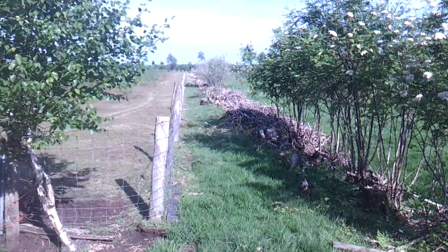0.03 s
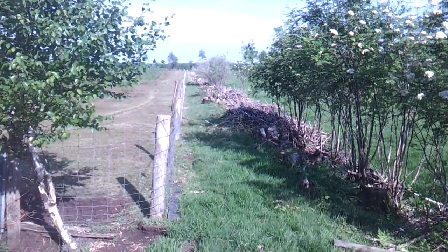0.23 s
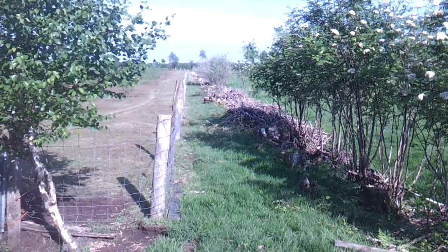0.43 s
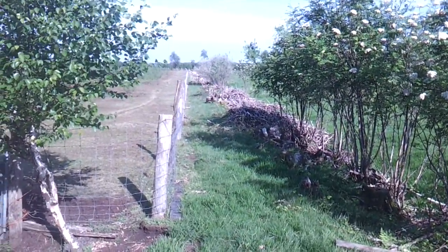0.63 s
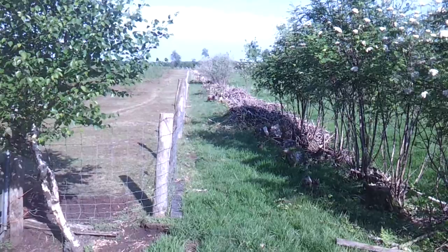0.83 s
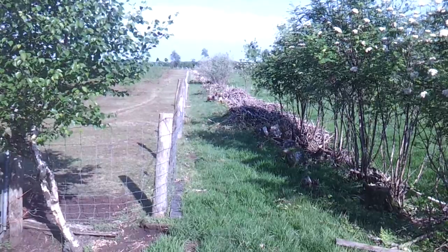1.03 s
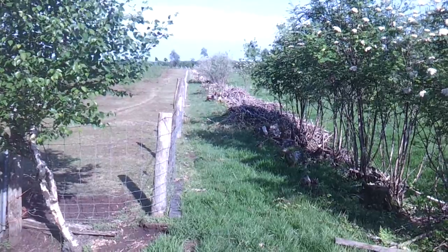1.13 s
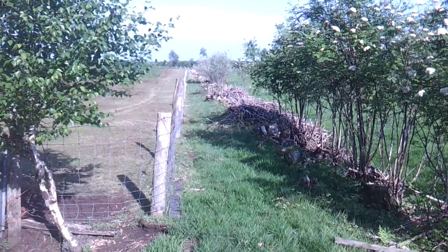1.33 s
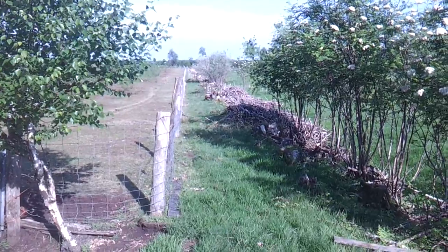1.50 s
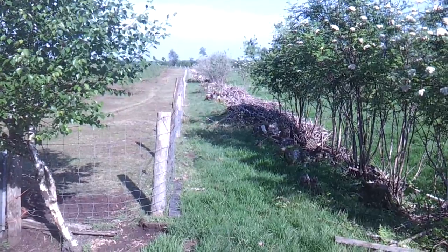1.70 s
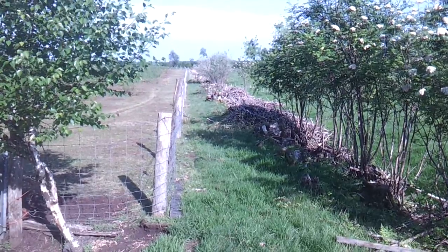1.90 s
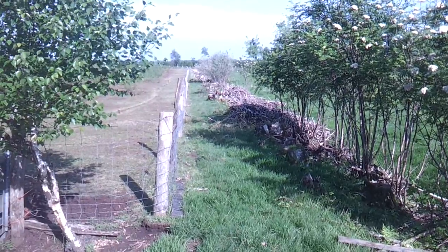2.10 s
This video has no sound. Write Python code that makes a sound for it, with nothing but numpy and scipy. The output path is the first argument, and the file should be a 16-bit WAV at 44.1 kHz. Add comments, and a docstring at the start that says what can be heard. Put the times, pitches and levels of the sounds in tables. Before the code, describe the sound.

A lamb gives one thin bleat, with faint birds and wind buffeting the microphone.

```python
"""A soft hiss hangs over an open paddock; songbirds whistle and twitter in the hedge, which echoes faintly.
Almost at once a gust pops and rumbles on the microphone. With the next gust a lamb close by gives
one thin, bright bleat: its vocal folds ring a small throat, crack once and slacken to a creak.
The birds carry on, and weaker gusts buffet the microphone to the end."""
import sys
import numpy as np
from scipy import signal
from scipy.fft import rfft, irfft
from scipy.io import wavfile

SR = 44100
rng = np.random.default_rng(int(sys.argv[2]) if len(sys.argv) > 2 else 0)


def generate_wav(signal):
    """Clip the signal to [-1, 1] and save it as 16-bit WAV at the path in sys.argv[1]."""
    frames = np.transpose(np.atleast_2d(signal))
    scaled = np.clip(frames, -1, 1) * 32767
    pcm = np.round(scaled).astype(np.int16)
    wavfile.write(sys.argv[1], SR, pcm)


N = 94815
T = np.arange(N) / SR
TOP_HZ = 15500


def amp(db):
    """Decibels to gain."""
    return 10 ** (np.asarray(db) / 20)


def unit(x):
    """Scales to rms 1."""
    return x / np.sqrt(np.mean(x ** 2) + 1e-20)


def add(mix, start_s, sound):
    """Drops a sound into the mix at a given time."""
    part = mix[max(round(start_s * SR), 0):][:len(sound)]
    part += sound[:len(part)]


def drift(size, hz):
    """Random modulation below hz, with an rms of about 1."""
    passband = np.fft.rfftfreq(N, 1 / SR) < hz
    return unit(irfft(rfft(rng.standard_normal(N)) * passband, N))[:size]


def colour(x, points):
    """Minimum-phase EQ through points of (frequency [Hz], gain [dB])."""
    size = 8192
    hz, db = np.transpose(points)
    log_hz = np.log(abs(np.fft.fftfreq(size, 1 / SR)) + 1)
    log_gain = np.log(amp(np.interp(log_hz, np.log(hz), db)))
    taps = np.fft.ifft(np.exp(np.conj(signal.hilbert(log_gain)))).real[:size // 2]
    return signal.fftconvolve(x, taps)[:len(x)]


def air():
    """The bed: an even, slightly wavering hiss of open field."""
    # tone of the outdoor hiss (frequency [Hz], gain [dB])
    hiss = [(30, -3), (200, -13), (420, -26), (620, -12.5), (850, -27.5), (1300, -24.5), (2900, -26.5),
            (4500, -26), (6400, -22.5), (8300, -34), (11000, -37), (15000, -37)]
    level_db, waver_db = -56.5, -0.66
    return unit(colour(rng.standard_normal(N), hiss)) * amp(level_db + waver_db * drift(N, hz=3.4))


def wind():
    """Lumpy turbulence rumbles; each eddy pops as a lopsided dip of pressure and sheds a short wake."""
    # swell of the turbulence (time [s], level [dB])
    gusts = [(0, -48.5), (.19, -47), (.24, -28), (.29, -41.5), (.45, -50), (.53, -51.5), (.62, -46),
             (.69, -29), (.8, -42.5), (1.0, -40.5), (1.13, -41.5), (1.18, -51.5), (1.4, -54.5), (1.55, -53),
             (1.7, -45.5), (1.9, -47), (2.06, -56), (2.15, -50.5)]
    # tone of the turbulence (frequency [Hz], gain [dB])
    rumble = [(15, -24.5), (30, -3), (70, 4), (160, -1), (260, -13.5), (420, -24.5), (800, -16.5),
              (2000, -58.5)]
    # eddies striking the microphone (time [s], level [dB], main frequency [Hz])
    eddies = [(.152, -39.5, 135), (0.2121, -11.5, 413.4), (0.2167, -21, 218), (0.223, -13, 393),
              (.233, -11.5, 270), (.2510, -11.5, 467.6), (0.2546, -11, 280), (.263, -18.5, 302.2),
              (0.336, -38.5, 110), (0.412, -41, 60), (0.45, -33, 60), (0.6414, -19, 260), (.6435, -25, 300),
              (.679, -22, 121), (.6843, -20.5, 316), (0.692, -12, 235.9), (0.705, -17, 161.4),
              (.731, -22.5, 154), (.742, -13.5, 156.2), (.777, -22, 99), (0.792, -28, 148.1),
              (.859, -16.5, 186.2), (0.8621, -11.5, 330.8), (0.8924, -24.5, 217), (0.915, -28, 109),
              (.929, -28.5, 109.5), (0.9559, -16.5, 218), (.981, -21.5, 168), (.998, -23, 125),
              (1.039, -25, 103), (1.1205, -19.5, 121.4), (1.253, -43.5, 130), (1.288, -47, 110),
              (1.447, -28.5, 92.6), (1.535, -40.5, 180), (1.585, -27, 132), (1.608, -32.5, 141.5),
              (1.686, -33.5, 210), (1.696, -26.5, 140), (1.728, -24.5, 270.5), (1.757, -35, 170),
              (1.771, -31.5, 129.4), (1.849, -27, 198.3), (1.878, -22, 122.7), (1.913, -35, 111),
              (1.976, -28, 201.5), (2.017, -36.5, 129), (2.114, -29, 203)]
    lumps_db, neutral_gust_db = 3, -29
    eddy_order, wake_s, wake_db = 1.92, 0.0033, -12.5
    gust = amp(np.interp(T, *np.transpose(gusts)))
    out = unit(colour(rng.standard_normal(N), rumble) * amp(lumps_db * drift(N, hz=36.6))) * gust
    top = signal.filtfilt(*signal.butter(2, 222, "high", fs=SR), out)
    out += top * ((gust / amp(neutral_gust_db)) ** 0.25 - 1)  # stronger gusts are brighter
    for (at, db, hz), skew in zip(eddies, 0.67 * rng.uniform(0, 1.9, len(eddies))):
        passage = 2 * np.pi * hz * (T - at) / eddy_order
        dip = (np.exp(-1j * skew) / (1 - 1j * passage) ** (eddy_order + 1)).real
        age = np.maximum(T - at, 0) / wake_s
        wake = age * np.exp(1 - age) * drift(N, hz=.6 * hz) * np.sin(2 * np.pi * hz * T)
        out += amp(db) * (amp(wake_db) * wake - dip)
    return out


def birds():
    """Warbling whistles, each arching through three pitches. Two stems: song and far, rough twitter."""
    # bird notes and one faint low call from afar (start [s], length [s], first pitch [Hz],
    # middle pitch [Hz], last pitch [Hz], level [dB], warble depth [Hz])
    notes = [(0, 0.094, 586, 588, 580, -61, 38), (0.024, 0.052, 2810, 2940, 2930, -64.5, -2),
             (0.061, 0.05, 3000, 3154, 2940, -55, 0), (0.051, .035, 1900, 2200, 2800, -67, 0),
             (0.086, 0.031, 2650, 1980, 1770, -63.5, -4), (0.292, 0.04, 3070, 3010, 2800, -63.5, 30),
             (0.321, 0.055, 2700, 2730, 2900, -65.5, 45), (.3, .216, 1830, 1865, 1868, -54.5, 72),
             (0.322, 0.027, 4600, 4600, 4660, -68.5, -5), (0.416, 0.063, 3560, 3140, 2690, -62.5, 56),
             (0.533, 0.055, 2200, 2260, 2240, -64, 0), (.568, 0.09, 2440, 2210, 1900, -58, 26),
             (.57, 0.089, 6470, 6080, 5680, -60.5, 56), (0.592, 0.038, 4230, 4210, 3860, -66, 0),
             (.865, 0.12, 1810, 1813, 1923, -63, 33), (0.957, .152, 1894, 2042, 2024, -50.5, 0),
             (1.13, 0.072, 2306, 2533, 2600, -58, 24), (1.143, 0.11, 2290, 2253, 1970, -66.5, 23),
             (1.166, 0.092, 2705, 2823, 2626, -61, 220), (1.241, 0.083, 2605, 2380, 2170, -65.5, 54),
             (1.201, .347, 1628, 1894, 1606, -59.5, 22), (1.797, 0.02, 4300, 3530, 3020, -60.5, 4),
             (1.809, 0.031, 4210, 4700, 4360, -63, 88), (1.833, .013, 3640, 3530, 3400, -71, 3),
             (1.844, 0.018, 4110, 4550, 4650, -69, 0), (1.866, 0.021, 3130, 3580, 4060, -65, 2),
             (1.892, 0.015, 3900, 3280, 3100, -70, 0), (1.958, 0.028, 4720, 4200, 3900, -69, 0)]
    warble_hz, warble_fade_s, tremolo_db_per_hz, buzz_depth_hz = 43.6, .13, .06, 100
    waver_hz, rough_hz, twitter_above_hz = 15.2, 240, 3350
    edge_s, flutter_db = 0.0019, 2
    song, twitter = np.zeros((2, N))
    for start, length, first, middle, last, db, depth in notes:
        far = middle > twitter_above_hz
        t = np.arange(0, length, 1 / SR)
        progress = t / length
        rate = warble_hz * (3.9 if depth > buzz_depth_hz else 1)  # a deep warble is a fast buzz
        rate = rate * (1 + 0.27 * drift(len(t), hz=42))
        warble_fade = np.exp(-t / warble_fade_s)
        warble = np.sin(2 * np.pi * np.cumsum(rate) / SR) * warble_fade
        arch = np.polyval(np.polyfit([0, .5, 1], [first, middle, last], 2), progress)
        hz = arch + depth * warble + waver_hz * drift(len(t), hz=44.8)
        hz += far * rough_hz * drift(len(t), hz=420)
        envelope = np.clip(np.minimum(t, length - t) / edge_s, 0, 1) * np.sin(np.pi * progress) ** 0.22
        tremolo = amp(tremolo_db_per_hz * min(depth, buzz_depth_hz) * (warble - warble_fade))
        whistle = unit(envelope * tremolo * np.sin(2 * np.pi * np.cumsum(hz) / SR))
        add(twitter if far else song, start, whistle * amp(db + flutter_db * drift(len(t), hz=55.6)))
    return song, twitter


def hedge(send):
    """Trees and hedge scatter the sound into a short tail of echoes."""
    predelay_s, t60_s, echoes_per_s = .008, .33, 2000
    t = T[:SR]
    taps = rng.standard_normal(SR) * (rng.random(SR) < echoes_per_s / SR)
    taps *= (t > predelay_s) * amp(-60 * t / t60_s)
    return signal.fftconvolve(send, taps / np.linalg.norm(taps))[:N]


def lamb():
    """Sharp vocal-fold pulses ring a small, bright throat; the ground returns a quick bounce."""
    # contour of the bleat (time [s], pulse rate [Hz], level [dB])
    bleat = [(0.645, 314, -39), (0.659, 331.2, -47), (0.681, 350, -40.5), (0.693, 329.5, -47.5),
             (0.717, 365.6, -38.5), (0.729, 381, -40.5), (0.749, 373.6, -40), (0.785, 400.8, -39.5),
             (0.853, 402.3, -40), (0.899, 373.8, -44), (0.969, 365.7, -44), (0.989, 354.4, -44),
             (1.025, 359.5, -45.5), (1.037, 351.5, -45.5), (1.06, 345, -49.5)]
    # resonances of throat and mouth (frequency [Hz], gain [dB])
    throat = [(350, -16), (850, -60), (1250, -9.5), (1550, -12.5), (1900, -19), (2850, -17.5), (3300, -2.5),
              (3750, -3), (4400, 0.5), (4800, -2.5), (5400, -3), (6100, -4), (7000, -15.5), (7800, -28),
              (10200, -31), (14000, -48)]
    breath_s, breath_db, rasp_db, fade_s = .022, -12, -30, 0.012
    crack_at_s, crack_width_s, crack_treble_db = .982, .009, -9
    release_s, release_db, sag_hz_per_s = 0.042, -20, 6500
    bright_db, dulling_db_per_s = 3.5, -13
    bounce_s, bounce_db = .001474, -11.5
    at, pitch, level = np.transpose(bleat)
    t = np.arange(at[0] - breath_s, at[-1] + release_s, 1 / SR)
    before, after = np.maximum(at[0] - t, 0), np.maximum(t - at[-1], 0)
    crack = np.exp(-((t - crack_at_s) / crack_width_s) ** 2)
    jitter = .0013 + .035 * crack + .002 * (t > crack_at_s)  # cracks once, stays a little hoarse
    hz = np.interp(t, at, pitch) - sag_hz_per_s * after  # the folds slacken to a creak
    hz = np.maximum(hz, pitch.min() / 2) * (1 + jitter * drift(len(t), hz=231))
    cycles = np.cumsum(hz) / SR
    pulses = unit(sum(np.cos(2 * np.pi * k * cycles) * (k * hz < TOP_HZ) for k in range(1, 80)))
    voiced = np.clip((t - at[0]) / fade_s, 0, 1)
    breath = amp(breath_db) * (1 - voiced) * (1 - before / breath_s)  # air flows before the folds catch
    puffs = unit(np.exp(-(cycles % 1) / 0.33) * rng.standard_normal(len(t)))
    shimmer = 1 + .02 * drift(len(t), hz=150)
    voice = colour(voiced * pulses * shimmer + puffs * (amp(rasp_db) + breath), throat)
    treble = signal.filtfilt(*signal.butter(3, 4800, "high", fs=SR), voice)
    treble_db = bright_db + dulling_db_per_s * (t - t[0])  # dulls as the mouth closes
    voice += treble * (amp(treble_db + crack_treble_db * crack) - 1)
    voice += amp(bounce_db) * np.interp(t - bounce_s, t, voice, left=0)
    envelope = amp(np.interp(t, at, level) + release_db * after / release_s)
    fade_out = np.clip((t[-1] - t) / fade_s, 0, 1)
    out = np.zeros(N)
    add(out, t[0], unit(voice) * envelope * fade_out)
    return out


def scene():
    """Everything sits in the centre; only a very faint hiss spreads left and right."""
    bleat = lamb()
    song, twitter = birds()
    echo = hedge(amp(-17) * bleat + amp(-12) * song + amp(-1.5) * twitter)  # the twitter is wettest
    mono = bleat + song + twitter + echo + wind() + air()
    return mono + amp(-95) * rng.standard_normal((2, N))


def record(dry):
    """A steep low-pass trims the very top of the mix."""
    lowpass = signal.firwin(511, TOP_HZ, window=("kaiser", 9), fs=SR)
    return signal.oaconvolve(dry, lowpass[None], "same")


dry = scene()
out = record(dry)
generate_wav(out)
```